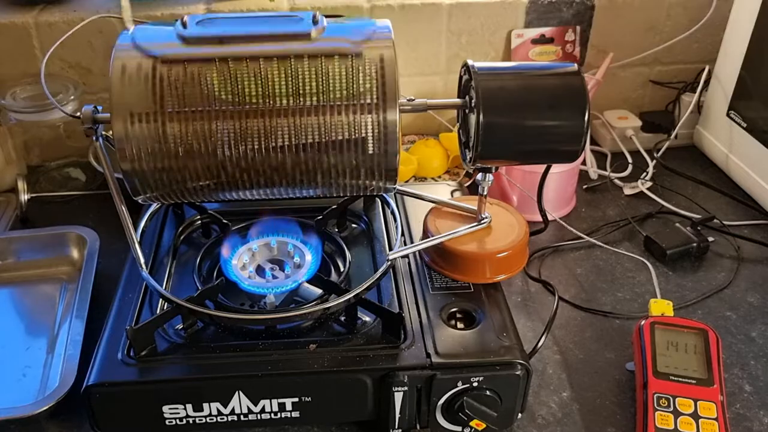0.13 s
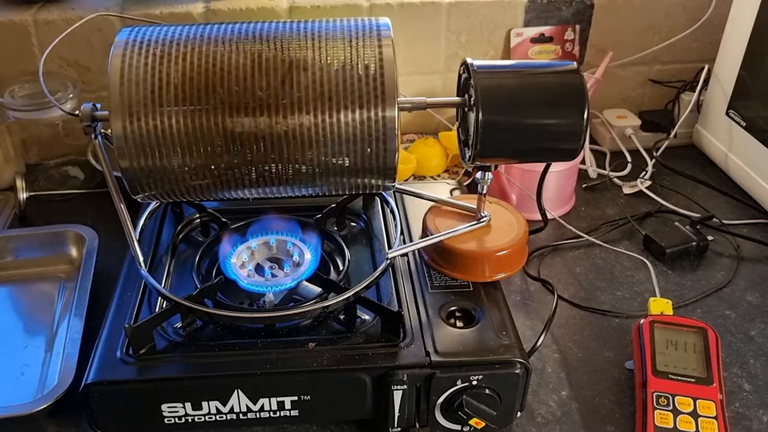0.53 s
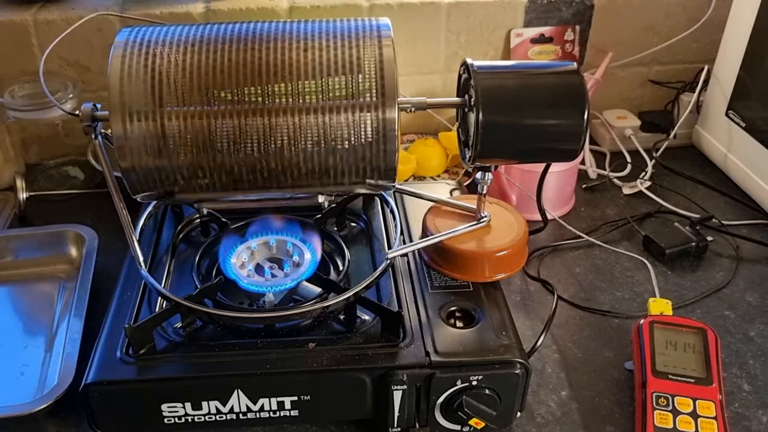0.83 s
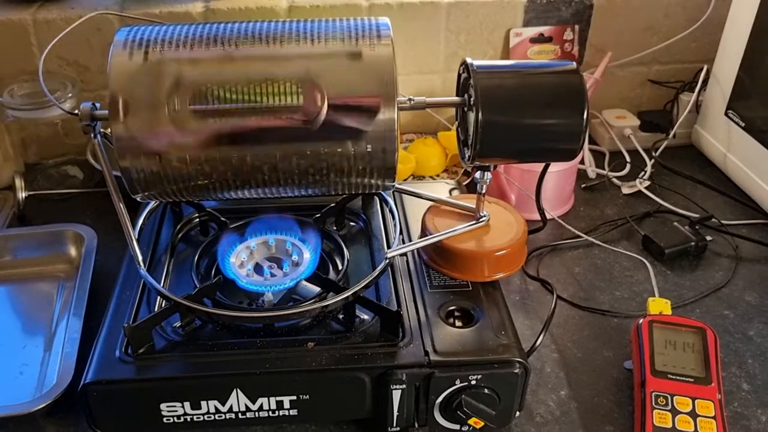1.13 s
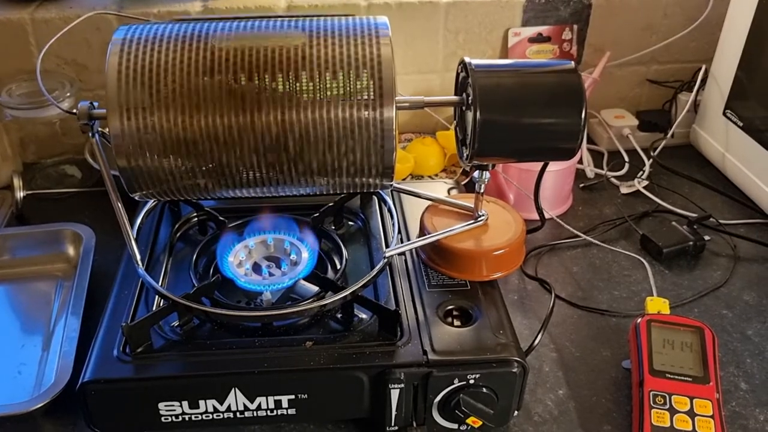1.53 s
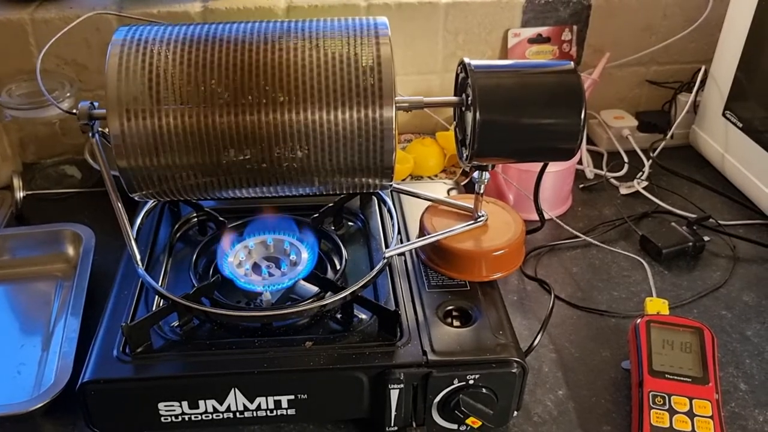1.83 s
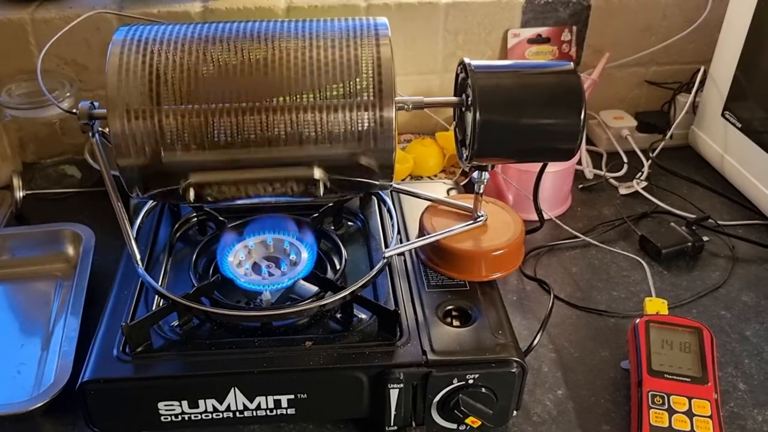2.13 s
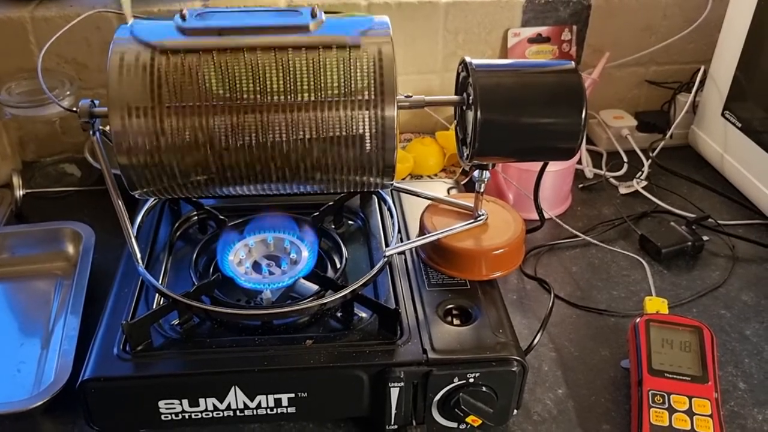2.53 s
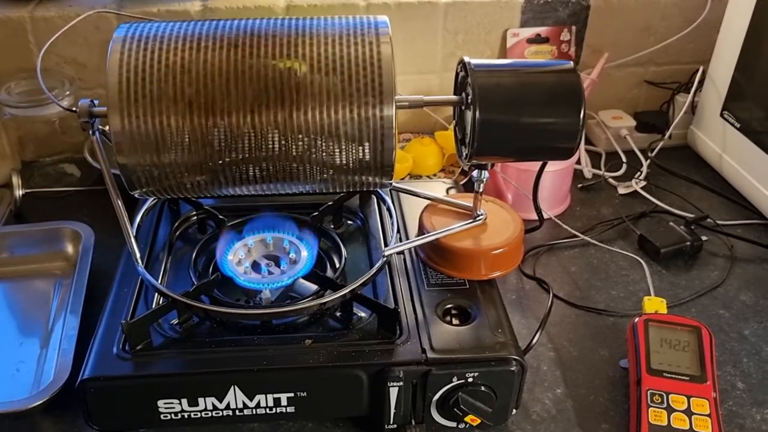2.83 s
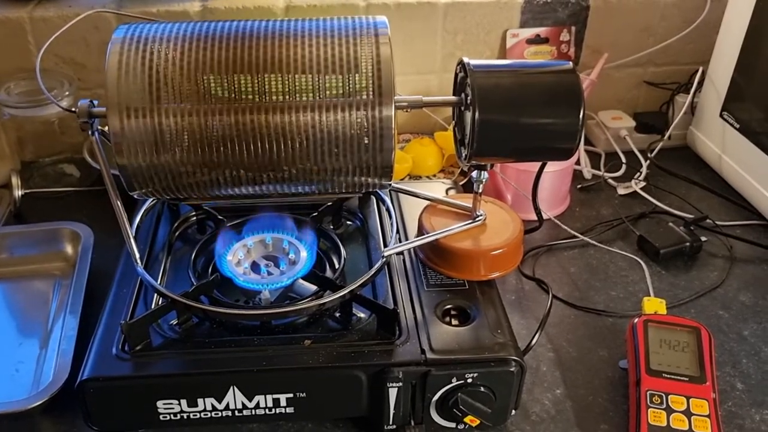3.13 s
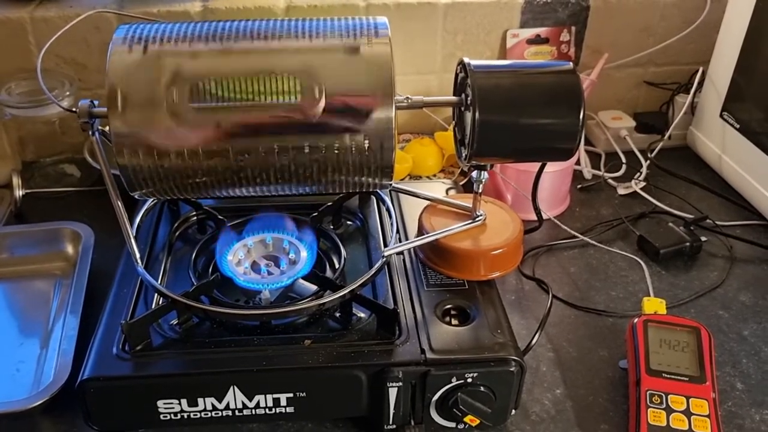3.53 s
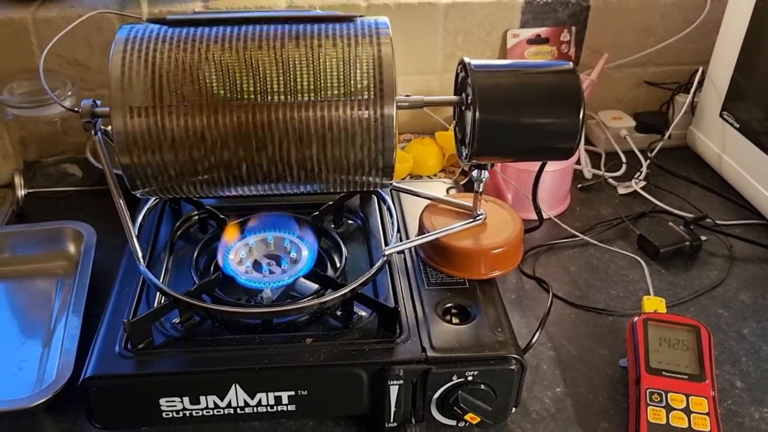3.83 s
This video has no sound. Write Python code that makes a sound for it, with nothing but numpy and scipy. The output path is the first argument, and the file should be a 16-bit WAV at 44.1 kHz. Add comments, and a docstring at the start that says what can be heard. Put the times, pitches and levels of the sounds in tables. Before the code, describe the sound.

Beans tumble in a rotating perforated steel drum, starting abruptly after a brief silence. A bright, rattling pour swells about every 1.2 seconds with a smaller slide between, over low motor hum and soft gas rush, close in a small kitchen.

```python
"""After a brief silence, rattling beans, a motor's hum and a soft rush start abruptly together.
Coffee beans tumble in a perforated steel drum, with a big pour and a smaller slide each turn.
The beans are thousands of random impacts that click, trail off in scatter and ring the drum's modes.
A small geared motor adds steady tones and coloured noise; its hum and whirr sink during the big pour.
Underneath, a gas flame rushes as coloured noise; the small kitchen adds a faint tail to the beans."""
import sys
import numpy as np
from scipy import signal
from scipy.fft import rfft, irfft, next_fast_len
from scipy.io import wavfile
from scipy.ndimage import uniform_filter1d, map_coordinates

SR = 44100
rng = np.random.default_rng(int(sys.argv[2]) if len(sys.argv) > 2 else 0)


def digitize_waveform(pressure):
    """Quantize a signal to 16-bit integers and store it at the path in sys.argv[1].

    Rows of a 2-D input are taken as channels; values are limited to [-1, 1].
    """
    field = np.atleast_2d(pressure).T
    bounded = np.clip(field, -1, 1)
    quanta = np.round(bounded * 32767).astype(np.int16)
    wavfile.write(sys.argv[1], SR, quanta)


N = 176400


def amp(db):
    """Turn decibels into a gain."""
    return 10 ** (np.asarray(db) / 20)


def unit(x):
    """Scale to an rms of 1."""
    return x / np.sqrt(np.mean(x ** 2) + 1e-20)


def along(points, hz):
    """Read a curve of (pitch_hz, value) points, joined on a log pitch axis."""
    f, v = np.transpose(points)
    return np.interp(np.log(hz + 1), np.log(f + 1), v)


def clock():
    """Time of each sample in seconds."""
    return np.arange(N) / SR


TURN_S = 1.1938  # one turn of the drum


def each_turn(rows):
    """Read the columns of a one-turn table, repeated as the drum turns."""
    s, *cols = np.transpose(rows)
    return [np.interp(clock(), s, c, period=TURN_S) for c in cols]


def wobble(rate):
    """A smooth random curve through `rate` random points a second."""
    knots = rng.standard_normal(int(N * rate / SR) + 4)
    return map_coordinates(knots, [clock() * rate])


def filtered(x, response):
    """Filter x by a gain, real or complex, given for each frequency."""
    m = next_fast_len(N + SR // 4)
    return irfft(rfft(x, m) * response(np.fft.rfftfreq(m, 1 / SR)), m)[..., :N]


def resonance(f, hz, width):
    """Response of one resonance, scaled to pass unit power from white noise."""
    peak = 1j * f * width / (hz * hz - f * f + 1j * f * width)
    return peak * np.sqrt(SR / np.pi / width)


def coloured(x, points):
    """Colour x by a curve, keeping the power of a white input."""
    return filtered(x, lambda f: unit(amp(along(points, f))))


def pan(db):
    """Left and right gains for a level difference; positive favours the left."""
    return amp(np.array([[.5], [-.5]]) * db)


def widen(x, side_db):
    """Raise the difference between left and right."""
    mid = x.mean(axis=0)
    return mid + amp(side_db) * (x - mid)


# How alike left and right are in rushing noise: pitch_hz, likeness (1 same, 0 unrelated, -1 opposite;
# values beyond that range are clipped)
LIKENESS = [(60, 1), (150, 1), (380, 0.71), (700, 0.013), (1300, -.15), (5000, 0.77), (12000, -1.3)]


def rush(points):
    """Stereo noise, alike on both sides in the bass, made from a shared and an opposed part."""
    def parts(f):
        turn = np.arccos(np.clip(along(LIKENESS, f), -1, 1)) / 2
        return amp(along(points, f)) * [np.cos(turn), np.sin(turn)]

    mid, side = filtered(rng.standard_normal((2, N)), parts)
    return unit(np.array([mid + side, mid - side]))


# Colour of the burner noise: pitch_hz, relative level_db per Hz
FLAME_COLOUR = [(20, -26), (40, -21), (60, -2.5), (130, -1), (260, -2), (600, -3), (1200, 1.5),
                (2200, -8.5), (4000, -11), (15000, -30)]
FLAME_DB = -43.5  # middle level, around which it wavers


def flame():
    """The burner's soft rush: wide noise with a small random waver."""
    return amp(FLAME_DB + 1.3 * wobble(6.4)) * rush(FLAME_COLOUR)


# Motor tones: pitch_hz, relative level_db, unsteadiness (ratio of random to steady part)
HUM_TONES = [(101.4, -47, .06), (78.3, -59.5, 0.42), (199, -55.5, .4), (294, -57, 0.55),
             (491.7, -55.5, 0.27), (869, -52.5, 0.61)]


def hum_tones():
    """Each tone is a sine whose strength and phase waver at random."""
    t = clock()
    total = 0
    for hz, db, rough in HUM_TONES:
        waver = 1 + rough * (wobble(16) + 1j * wobble(15))
        tone = np.sqrt(2) * np.real(waver * np.exp(2j * np.pi * hz * t))
        total = total + amp(db) * tone / np.sqrt(1 + 2 * rough ** 2)
    return total


# Low gear drone: pitch_hz, width_hz of each of two filter passes, relative level_db
GEAR_DRONE = [(129.6, 13, -55.5), (150, 8.5, -58), (188, 10.6, -61.5), (76, 11, -60)]


def gear_drone():
    """Noise passed twice through each low resonance leaves a blurred drone."""
    total = 0
    for hz, width, db in GEAR_DRONE:
        noise = rng.standard_normal(N)
        total = total + amp(db) * unit(filtered(noise, lambda f: resonance(f, hz, width) ** 2))
    return total


# Motor through one turn: time_s into the turn, relative hum_db, relative whirr_db
MOTOR_TURN = [(.1, -1.5, 7), (.42, -0.5, 1), (.55, -6.5, 1.5), (.65, -13, -5.5), (.82, -24, -1.5),
              (.91, -19, -26), (.98, -1.5, -2), (1.06, -2, 3.5)]
# Colour of the gear whirr: pitch_hz, relative level_db per Hz
WHIRR_COLOUR = [(100, -19), (260, -10), (330, 0), (430, 1.5), (495, 7), (570, -9), (670, -7.5), (790, 4.5),
                (870, 5), (980, -9), (1300, -4), (1900, -2.5), (3500, -17.5), (9000, 1)]
MESH_HZ, MESH_DEPTH, GEAR_BEAT = 17, 0.19, 0.2  # throb rate, and its depth on whirr and hum
WHIRR_DB, LOAD_DRONE_DB, MOTOR_PAN_DB = -36.5, 1.5, -4


def motor():
    """Hum and gear whirr throb with the gear and follow the load through each turn, over a low drone."""
    hum_db, whirr_db = each_turn(MOTOR_TURN)
    throb = np.sin(2 * np.pi * MESH_HZ * clock())
    hum = amp(hum_db) * (1 + GEAR_BEAT * throb) * hum_tones()
    # the drone grows while the hum sinks
    drone = amp(-LOAD_DRONE_DB * amp(hum_db)) * gear_drone()
    whirr_level = amp(WHIRR_DB + whirr_db + 0.97 * wobble(25.18))
    whirr = whirr_level * (1 + MESH_DEPTH * throb) * rush(WHIRR_COLOUR)
    return pan(MOTOR_PAN_DB) * (hum + drone + whirr)


HITS_PER_S, FULL_DB = 9000, -22  # rate of impacts when the flow is at FULL_DB
DENSITY_GROWS, SIZE_SPREAD_DB = .7, 3.5  # dB of density per dB of flow; spread of impact sizes
LEFT_LAG_S, LAG_SPREAD_S = .0002, .00018  # average extra delay on the left, and its spread


def impacts(level_db, full_rate):
    """Random bean impacts in stereo: more flow makes them both denser and harder."""
    chance = full_rate / SR * amp(DENSITY_GROWS * (level_db - FULL_DB))
    chance = np.clip(chance, 1e-4, 1)
    size = unit(amp(SIZE_SPREAD_DB * rng.standard_normal(N)) * rng.standard_normal(N))
    struck = rng.random(N) < chance
    right = struck * size / np.sqrt(chance) * amp(level_db)
    # each impact comes from its own place, so it has its own delay
    lag = np.rint(SR * (LEFT_LAG_S + LAG_SPREAD_S * rng.standard_normal(N))).astype(int)
    arrival = np.clip(np.arange(N) + lag, 0, N - 1)
    return np.array([np.bincount(arrival, right, N), right])


CHATTER_S, CHATTER_DB = 0.007, 3.5  # time constant of the scatter's power, and its level


def chatter(x):
    """Each impact trails a tiny burst of scatter inside the drum; the total power stays."""
    keep = np.exp(-1 / (CHATTER_S * SR))
    power = signal.lfilter([1 - keep], [1, -keep], x ** 2)
    trail = np.sqrt(power) * rng.standard_normal(x.shape)
    return (x + amp(CHATTER_DB) * trail) / np.sqrt(1 + amp(CHATTER_DB) ** 2)


# depth of the shifting peaks and valleys: everywhere, and extra around the middle pitch
PATCH_DB, PATCH_MID_DB, PATCH_MID_HZ = 1.65, 2.6, 4000


def patchy(x):
    """Tumbling beans keep changing the paths out of the drum, so peaks and valleys come and go."""
    def smooth(v):
        across_pitch = uniform_filter1d(v, size=3, axis=0)
        return uniform_filter1d(across_pitch, size=9, axis=1)

    hz, _, z = signal.stft(x, SR, nperseg=1024)
    field = unit(smooth(smooth(rng.standard_normal(z.shape[1:]))))
    octaves = np.log2((hz + 1) / PATCH_MID_HZ)
    depth_db = PATCH_DB + PATCH_MID_DB * np.exp(-2 * octaves ** 2)
    gain = amp(depth_db[:, None] * field)
    gain = gain / np.sqrt(np.mean(gain ** 2, axis=1, keepdims=True))
    return signal.istft(z * gain, nperseg=1024)[1][:, :N]


MODE_WANDER = 0.0023  # typical share by which a pitch drifts as beans load the wall


def mode(blows, hz, width):
    """One ringing mode with a drifting pitch; it passes unit power from white noise."""
    pitch = hz * (1 + MODE_WANDER * wobble(9))
    turn = np.exp(2j * np.pi * np.cumsum(pitch) / SR)
    keep = np.exp(-np.pi * width / SR)
    # shift the mode down to 0 Hz, let it decay there, then shift it back
    ring = signal.lfilter([np.sqrt(2 * (1 - keep ** 2))], [1, -keep], blows / turn)
    return np.real(turn * ring)


# Beans moving through one turn: time_s into the turn, level_db before the uneven and random changes
FLOW_TURN = [(0, -25), (.035, -24.5), (.16, -27), (.24, -37), (.32, -37), (.41, -30.5), (.48, -29.5),
             (.55, -24.5), (.595, -18.5), (.65, -18.5), (.75, -19.5), (.835, -17.5), (.91, -21.5),
             (.97, -30.5), (1.04, -40), (1.11, -35.5)]
# Uneven bean level from start to end, gentle at first with quick swings near the end: time_s, change_db
FLOW_UNEVEN = [(.2, 2.5), (1.1, 2.5), (1.5, 1.5), (2.3, 1.5), (2.8, 0.54), (3.2, 2.8), (3.45, -1.5),
               (3.62, 3), (3.78, 1), (3.88, -3.5), (4, 1)]
SURGE_DB, CLUMP_DB = -0.5, 0.5  # slower and faster random changes


def bean_flow():
    """Level in dB of the moving beans: pours each turn, uneven swings, surges and clumps."""
    uneven = np.interp(clock(), *np.transpose(FLOW_UNEVEN))
    random_change = SURGE_DB * wobble(5.8) + CLUMP_DB * wobble(90)
    return each_turn(FLOW_TURN)[0] + uneven + random_change


# Stray beans that hit the wall hard: start_s, level_db before colouring
STRAY_BEANS = [(1.593, -21), (1.604, -23)]
STRAY_T60_S = 0.023  # time to fall by 60 dB


def stray_hits():
    """Each hard hit is a burst of noise that starts at once and dies away fast."""
    t = clock()
    total = 0
    for s, db in STRAY_BEANS:
        fall = amp(db - 60 * np.abs(t - s) / STRAY_T60_S) * (t >= s)
        total = total + fall * rng.standard_normal((2, N))
    return total


# Colour of the bean clicks: pitch_hz, relative level_db per Hz
CLICK_COLOUR = [(100, -40), (600, -23), (1200, -12), (2100, -3), (2750, -5.5), (3100, -3), (3450, -7),
                (4150, -10), (4900, -3.5), (5300, -3.5), (5800, .5), (6900, -1.5), (8000, 1), (10000, .5),
                (12000, -1), (12600, 4), (13400, 4), (14300, 3), (14800, .5), (15700, 1)]
# Place of the clicks: pitch_hz, left_minus_right_db
CLICK_PLACE = [(1000, -.5), (3000, 1), (4500, -3), (6500, 0), (7800, 1.5), (8700, 4), (10500, .5),
               (13000, 0), (14100, -3), (15500, -1.5)]
CLICK_DB = 3.5


def bean_clicks(hits):
    """Beans click on each other: scattered impacts, coloured and panned by pitch."""
    clicks = coloured(patchy(chatter(hits)), CLICK_COLOUR)
    return amp(CLICK_DB) * filtered(clicks, lambda f: pan(along(CLICK_PLACE, f)))


# Hollow tone of the falling stream, rising through the big pour: time_s into the turn, pitch_hz
HOLLOW_PITCH = [(.1, 1280), (.58, 900), (.7, 1060), (.8, 1220), (.88, 1530), (.98, 1510)]
HOLLOW_WIDTH_HZ, HOLLOW_DB = 85, -29


def hollow_stream(hits):
    """The falling beans excite one broad resonance that glides through each turn."""
    return amp(HOLLOW_DB) * mode(hits, each_turn(HOLLOW_PITCH)[0], HOLLOW_WIDTH_HZ)


# Weight of beans landing on the pile and wall: time_s into the turn, level_db before random changes
LANDING_TURN = [(.08, -40), (.28, -50), (.5, -50.5), (.62, -48.5), (.75, -36), (.815, -33), (.89, -38),
                (.97, -58.5), (1.1, -47)]


def landings():
    """Impacts of the beans that land on the pile and wall."""
    return impacts(each_turn(LANDING_TURN)[0] + CLUMP_DB * wobble(55), HITS_PER_S)


# Colour of the dull landing rattle: pitch_hz, relative level_db per Hz
THUD_COLOUR = [(200, -34), (650, -22), (1000, -8), (1400, -7), (1750, 5), (2100, -2), (2800, -21),
               (5000, -33)]


def landing_rattle(landing):
    """Landing impacts with their scatter, coloured to sound dull."""
    return coloured(chatter(landing), THUD_COLOUR)


# Ringing of the drum: pitch_hz, width_hz, relative level_db, left_minus_right_db before widening
DRUM_MODES = [(1701.6, 24, -1, -1), (1820, 33, -8.5, -5), (1911, 21, -1.5, 1.5), (1962, 26, -1.5, -0.5),
              (2443, 52, -3, 0.5), (3027, 38, -4.5, 2), (3247, 45, -5.5, 2.5), (3687, 50, 3, -2),
              (4451, 41, -2, -6.5), (5414, 36, 2, -3.5), (6180, 38, .3, -3), (6490, 30, 1.7, 1),
              (7160, 40, -5.5, 5), (7730, 48, 0, 0), (12900, 110, -4.5, 1), (13400, 120, -11, 1)]
RING_DB, RING_GROWS, RING_HITS_PER_S = -14.5, .82, 1400  # level, dB per dB of flow, rate at FULL_DB
THUD_RING_DB, THUD_RING_TOP_HZ = 3, 2100  # landings also ring the lowest modes


def drum_ring(flow_db, landing):
    """Bean blows set the steel drum's modes ringing, each mode with its own blows."""
    wall_db = FULL_DB + RING_GROWS * (flow_db - FULL_DB)
    ring = 0
    for hz, width, db, pan_db in DRUM_MODES:
        blows = amp(RING_DB) * impacts(wall_db, RING_HITS_PER_S)
        if hz < THUD_RING_TOP_HZ:
            blows = blows + amp(THUD_RING_DB) * landing
        ring = ring + amp(db) * pan(pan_db) * mode(blows, hz, width)
    return ring


RING_SIDE_DB = 2.5  # the ring reaches left and right partly out of phase


def beans():
    """Beans click on each other, ring the drum's modes and land with a dull, hollow rattle."""
    flow_db = bean_flow()
    hits = impacts(flow_db, HITS_PER_S) + stray_hits()
    landing = landings()
    ring = hollow_stream(hits) + drum_ring(flow_db, landing)
    return bean_clicks(hits) + landing_rattle(landing) + widen(ring, RING_SIDE_DB)


def echoes(x, t60, db):
    """Add a diffuse fading tail, scaled to keep the total power."""
    t = np.arange(SR // 3) / SR
    tail = rng.standard_normal((2, len(t))) * amp(-60 * t / t60)
    tail = tail / np.linalg.norm(tail, axis=1, keepdims=True)
    wet = signal.fftconvolve(x, tail, axes=1)[:, :N]
    return (x + amp(db) * wet) / np.sqrt(1 + amp(db) ** 2)


ROOM_T60_S, ROOM_DB = .22, -10  # time to fall by 60 dB, and level against the direct sound


def scene():
    """Flame, motor and beans in a small kitchen; only the beans get the room's tail."""
    return echoes(beans(), ROOM_T60_S, ROOM_DB) + motor() + flame()


START_S, OPEN_S = .128, .0035  # the sound begins here and opens this fast
TOP_HZ = 15760


def record(dry):
    """Open the sound abruptly, clip at full scale and keep nothing from the band limit up."""
    opened = np.clip((clock() - START_S) / OPEN_S, 0, 1)
    return filtered(np.clip(dry * opened, -1, 1), lambda f: f < TOP_HZ)


dry = scene()
out = record(dry)
digitize_waveform(out)
```